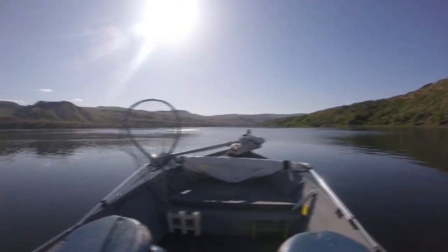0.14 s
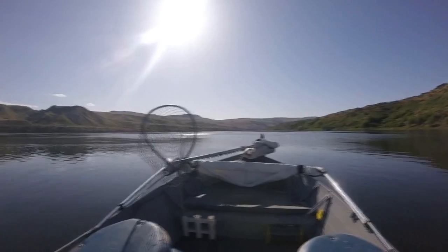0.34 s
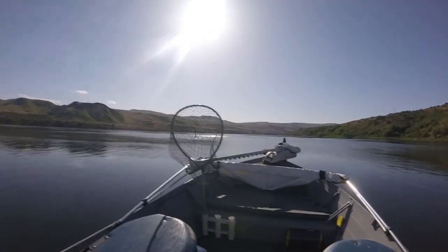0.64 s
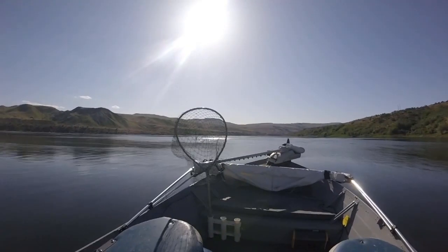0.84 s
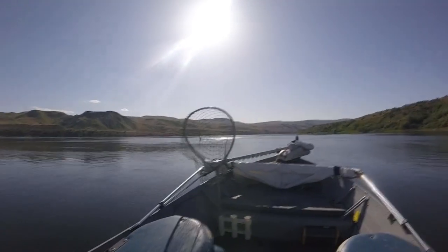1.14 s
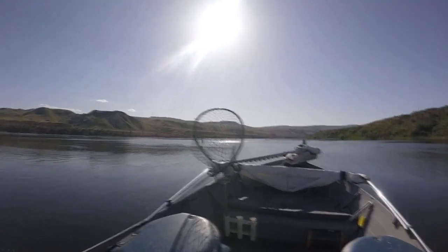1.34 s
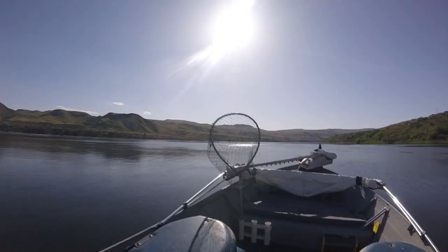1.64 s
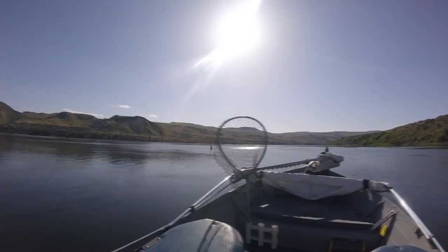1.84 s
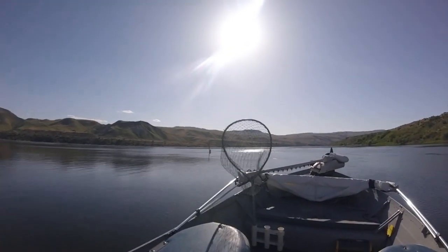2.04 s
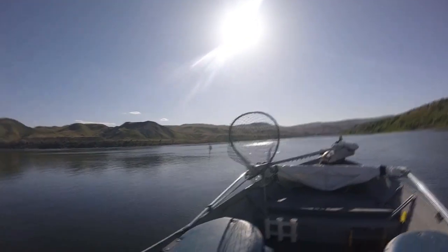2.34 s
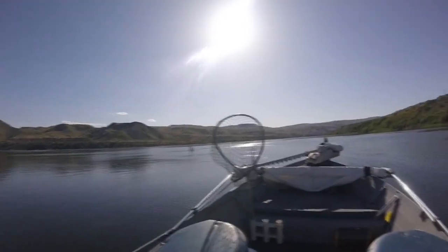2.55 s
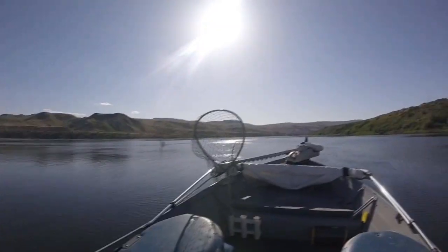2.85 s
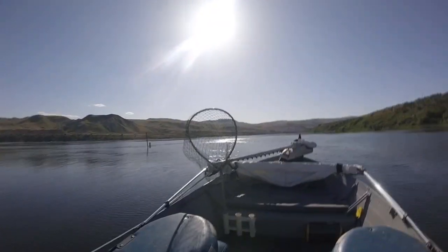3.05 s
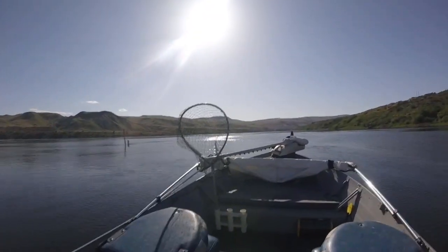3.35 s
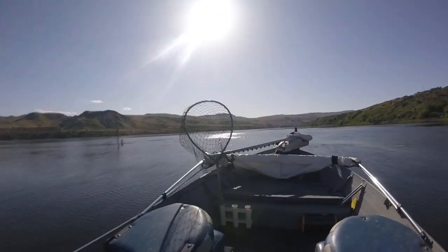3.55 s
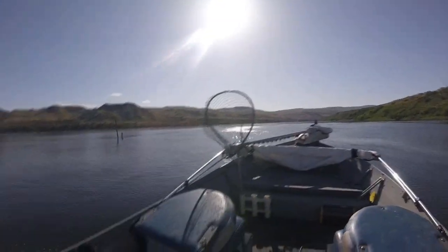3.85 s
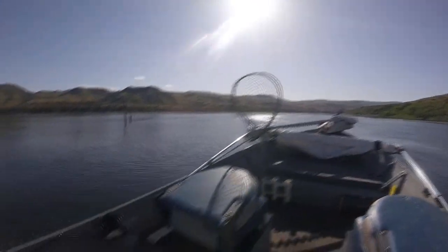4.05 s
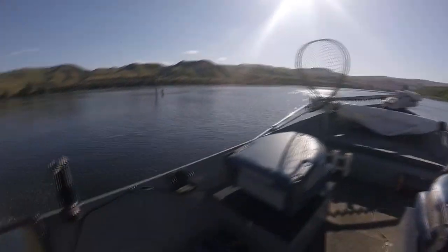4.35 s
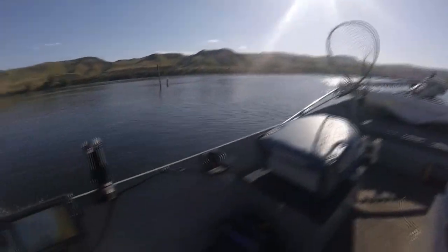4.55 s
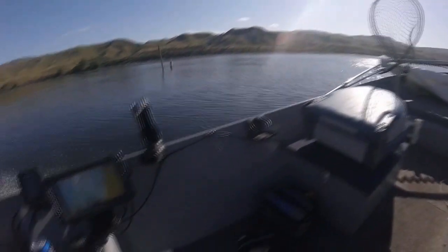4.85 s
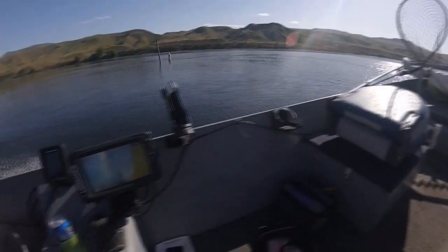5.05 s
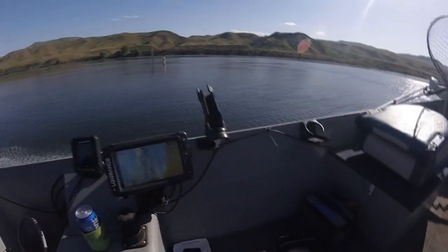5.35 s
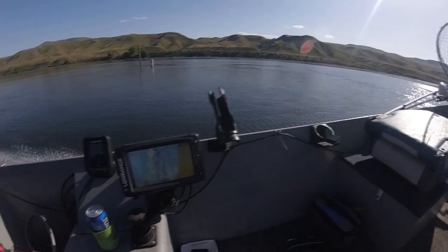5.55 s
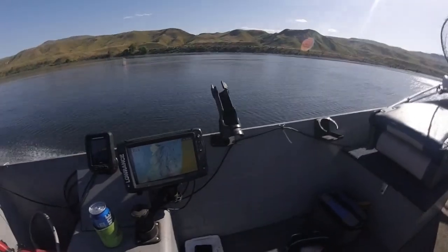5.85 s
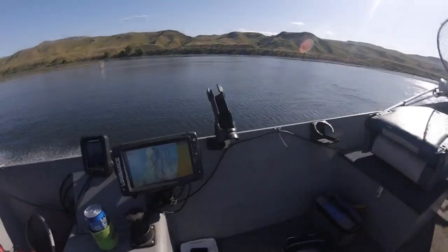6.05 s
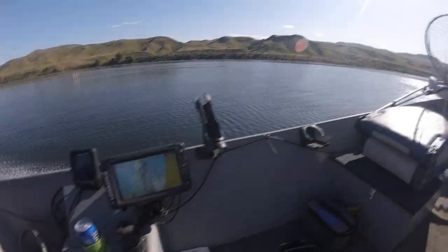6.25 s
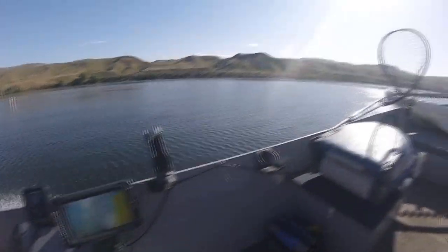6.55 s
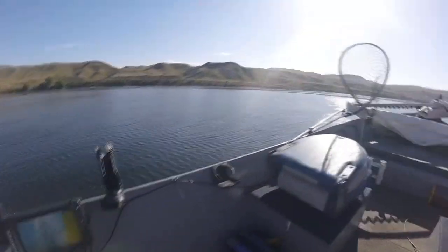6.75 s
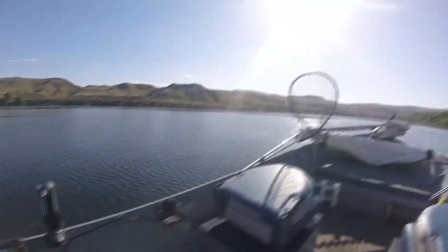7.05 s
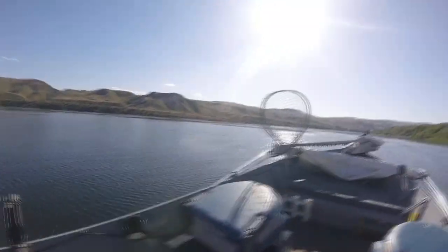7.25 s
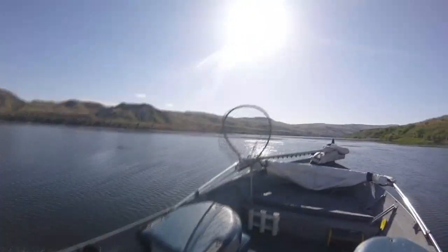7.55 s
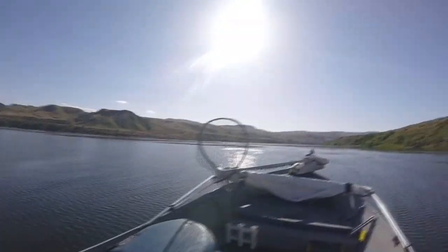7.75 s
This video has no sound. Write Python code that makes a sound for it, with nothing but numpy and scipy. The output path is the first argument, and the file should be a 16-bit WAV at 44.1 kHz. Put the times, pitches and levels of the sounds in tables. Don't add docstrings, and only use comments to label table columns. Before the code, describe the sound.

Close onboard perspective from a microphone worn on the head, outdoors with no room echo. An outboard hums at nearly constant pitch and spray washes broadly along the hull. Isolated wind knocks briefly duck the boat sound, which creeps back. Then the head turns, muffling motor and water, and dense fluttering gusts, low thumps and sharp clicks dominate, peaking in a hard crack late on and thinning a little afterwards.

```python
import sys
import numpy as np
from scipy import signal
from scipy.fft import rfft, irfft, next_fast_len
from scipy.io import wavfile
from scipy.ndimage import uniform_filter1d

SR = 44100
rng = np.random.default_rng(int(sys.argv[2]) if len(sys.argv) > 2 else 0)


def invert_db(level):
    return 10 ** (np.asarray(level, dtype=float) / 20)


def dump_mix(stems):
    frames = np.atleast_2d(stems).T
    limited = np.clip(frames, -1, 1)
    pcm = np.round(limited * 32767).astype(np.int16)
    wavfile.write(sys.argv[1], SR, pcm)


N = 347949

# (time [s], turn rate [1/s])
TURN_RATE_HZ = [(0, 50.23), (.6, 50.29), (1.4, 50.44), (1.8, 50.23), (2.2, 50.26), (2.6, 50.45),
                (3.0, 50.46), (3.4, 50.53), (4.2, 50.73), (5.4, 50.74), (6.0, 50.88), (6.6, 50.72),
                (7.89, 50.73)]
# (time [s], share [0-1])
HEAD_ASIDE = [(0, 0), (4.7, 0), (5.6, .6), (6.3, .95), (7.5, .95), (7.89, .85)]
# (frequency [Hz], density [dB per Hz])
ROAR_SPECTRUM = [(120, 1.5), (300, -0.5), (700, -5.5), (1200, -10.5), (2000, -20.5)]
# (time [s], length [s], roar level [dB], rasp over roar [dB])
AIR_RUSHES = [(0, 0.017, -40.5, 3), (0.024, 0.053, -34, -5.5), (0.065, 0.11, -30.5, -10.5),
              (0.202, 0.068, -31, -8.5), (4.6, 0.017, -33.5, -11), (4.628, 0.046, -30.5, -10),
              (4.724, 0.096, -30, -12), (4.84, 0.081, -32, -16.5), (4.914, 0.031, -30.5, -8),
              (4.96, 0.039, -49, -2), (4.987, 0.031, -38.5, 1), (5.02, 0.075, -36, -3.5),
              (5.117, 0.16, -39, .5), (5.27, 0.037, -36, 1.5), (5.328, 0.052, -40, -2),
              (5.412, 0.055, -40, -3), (5.456, 0.11, -39.5, -4), (5.539, 0.09, -32.5, -9),
              (5.602, 0.15, -32, -8.5), (5.811, 0.15, -29.5, -14), (5.961, 0.067, -30, -12),
              (6.012, 0.079, -31, -13.5), (6.144, 0.097, -28.5, -14.5), (6.331, 0.057, -25.5, -14.5),
              (6.388, 0.027, -30, -13), (6.427, 0.048, -38.5, -6.5), (6.506, 0.056, -34.5, -17),
              (6.68, 0.042, -34, -15), (6.9, 0.11, -35.5, -21), (7.129, 0.046, -34, -16)]


def rms_one(x):
    return x / np.sqrt(np.mean(x ** 2) + 1e-20)


def curve(rows):
    time_s, value = np.transpose(rows)
    return np.interp(np.arange(N) / SR, time_s, value)


def drift(rate_hz):
    r = np.exp(-80 * np.pi * rate_hz / SR)
    white = rng.standard_normal(N // 40 + 2002)
    slow = signal.lfilter([1], [1, -2 * r, r * r], white)[2000:]
    return np.interp(np.arange(N) / 40, np.arange(len(slow)), rms_one(slow))


def noise(spectrum, lumpy_db, rate_hz):
    hz, density_db = np.transpose(spectrum)
    size = next_fast_len(N)
    bin_hz = np.arange(size // 2 + 1) * SR / size + 1e-3
    shape = invert_db(np.interp(np.log(bin_hz), np.log(hz), density_db, left=-90, right=-90))
    white = rng.standard_normal(N) * invert_db(lumpy_db * drift(rate_hz))
    return rms_one(irfft(rfft(white, size) * shape, size)[:N])


def drops():
    # (time [s], length [s], start [Hz], end [Hz], level [dB])
    chirps = [
        (2.02, 0.039, 2400, 2550, -56.5),
        (2.108, .05, 2870, 2660, -52),
        (2.19, 0.041, 2620, 2430, -50),
        (2.277, 0.034, 2330, 2200, -50),
        (2.383, .02, 2100, 2300, -50),
        (2.553, 0.045, 2410, 2950, -48),
        (2.587, 0.011, 1740, 2000, -42),
    ]
    out, wobble = np.zeros(N), drift(60)
    for time_s, length_s, start_hz, end_hz, level_db in chirps:
        i, size = round(time_s * SR), round(length_s * SR)
        phase = 2 * np.pi * np.cumsum(np.linspace(start_hz, end_hz, size)) / SR
        whistle = np.sin(phase + 1.4 * wobble[i:i + size])
        out[i:i + size] += invert_db(level_db - 1.0) * signal.windows.tukey(size, .6) * whistle
    return out


def spray():
    # (frequency [Hz], density [dB per Hz])
    ahead_spectrum = [(70, -25.5), (130, -4.5), (250, -7), (500, -15), (1000, -18), (1900, -21.5),
                      (3000, -26), (4300, -29.5), (5200, -25.5), (6500, -27.5), (8000, -34), (11000, -46.5),
                      (12200, -60), (15000, -71)]
    # (frequency [Hz], density [dB per Hz])
    aside_spectrum = [(70, -30), (130, -6), (500, -13.5), (1500, -23.5), (2700, -22), (4200, -33.5),
                      (5250, -24), (7700, -37), (11000, -52), (12200, -72), (15000, -75)]
    ring_hz, ring_width_hz, ring_db = 6360, 610, -13.5
    aside = curve(HEAD_ASIDE)
    throb = 1 + 0.049 * np.sin(2 * np.pi * np.cumsum(curve(TURN_RATE_HZ)) / SR)
    r, w = np.exp(-np.pi * ring_width_hz / SR), 2 * np.pi * ring_hz / SR
    ring = rng.standard_normal(N)
    for _ in range(2):
        ring = signal.lfilter([1, 0, -1], [1, -2 * r * np.cos(w), r * r], ring)
    ahead = noise(ahead_spectrum, lumpy_db=-1.26, rate_hz=12)
    ahead += invert_db(ring_db + 1.3 * drift(30)) * rms_one(ring)
    shaded = invert_db(6.5) * noise(aside_spectrum, lumpy_db=1.0, rate_hz=29)
    wash = np.sqrt(1 - aside) * ahead + np.sqrt(aside) * shaded
    return invert_db(-36.5 - 18.5 * aside) * throb * wash


def motor():
    # (multiple of turn rate [1], level [dB])
    harmonics = [(2, -2), (3, -24.5), (4, 0), (5, -14.5), (6, -4), (7, -15), (8, -20), (9, -26.5),
                 (10, -19), (11, -25), (12, -23.5), (13, -38.5), (14, -20), (15, -16.5), (16, -26),
                 (17, -31.5), (18, -17), (19, -39), (20, -32), (21, -36), (22, -38.5), (23, -47),
                 (24, -38.5), (25, -29.5), (26, -19), (27, -27), (28, -35.5), (29, -32), (30, -39.5),
                 (31, -30.5),
                 (42, -37.5), (52, -34.5), (56, -38.5)]
    # (time [s], level [dB])
    whine_db = [(0, -22), (3, -20.5), (3.7, -19), (4.2, -17), (4.6, -26.5), (5.8, -25), (6.5, -27),
                (7, -34.5), (7.4, -29.5), (7.89, -27.5)]
    gear_multiple = 26
    aside = curve(HEAD_ASIDE)
    turns = np.cumsum(curve(TURN_RATE_HZ) * (1 + 0.00077 * drift(9.0))) / SR
    exhaust, cowl, gear = parts = np.zeros((3, N))
    for multiple, level_db in harmonics:
        part = 2 if multiple == gear_multiple else int(multiple >= 8)
        loose = np.clip(-level_db / 15 - 1, .3, 1.2)
        waver = invert_db(level_db + 3 * loose * drift(12))
        phase = 2 * np.pi * (multiple * turns + rng.random())
        parts[part] += waver * np.sin(phase + .8 * loose * (part < 2) * drift(8))
    mix = invert_db(-25 - 10 * aside) * exhaust + invert_db(-26 - 13.5 * aside) * cowl
    return np.sqrt(2) * (mix + invert_db(curve(whine_db)) * gear)


def gain_db():
    # (time [s], gain [dB])
    gain_steps = [(0, -10.5), (1.611, -15), (2.203, -9), (2.928, -10), (3.371, -11.5), (4.298, -14.5),
                  (4.673, -16), (4.92, -11.5), (5.1, -12), (5.303, -11), (5.52, -9), (5.743, -9), (6.093, -7.5),
                  (6.33, -3.5), (6.45, -5), (6.573, -2), (6.9, -2), (7.149, 1)]
    recovery_s = 0.79
    time_s, depth_db = np.transpose(gain_steps)
    t = np.arange(N) / SR
    last = np.maximum(np.searchsorted(time_s, t) - 1, 0)
    return uniform_filter1d(depth_db[last] * np.exp(-(t - time_s[last]) / recovery_s), size=180)


def buffet():
    # (time [s], level [dB])
    wind = [(0.0, -39.5), (1.1, -36), (1.47, -26), (1.74, -44), (1.95, -44.5), (2.11, -37.5), (2.4, -34.5),
            (2.94, -39), (3.73, -34.5), (3.98, -32), (5.05, -34), (5.12, -37), (5.65, -33.5), (6.08, -38),
            (6.5, -25.5), (6.66, -33), (7.1, -33.5), (7.89, -33)]
    # (frequency [Hz], density [dB per Hz])
    rumble_spectrum = [(12, 2), (25, 7.5), (70, 5), (110, -3.5), (200, -23)]
    # (frequency [Hz], density [dB per Hz])
    flutter_spectrum = [(60, -27), (110, 3), (200, 0.5), (400, -8), (900, -25.5), (2000, -49.5)]
    aside, wind_db = curve(HEAD_ASIDE), curve(wind)
    gust_db = wind_db - wind_db.mean()
    rumble = noise(rumble_spectrum, lumpy_db=3.5, rate_hz=6)
    rumble /= np.sqrt(uniform_filter1d(rumble ** 2, size=4000) + 1.5)
    flutter_db = -41.5 + 13 * aside + 0.5 * gust_db + 0.83 * drift(3.7)
    flutter = invert_db(flutter_db) * noise(flutter_spectrum, lumpy_db=5.0, rate_hz=51)
    draught = aside * invert_db(-40 + 0.29 * gust_db) * noise(ROAR_SPECTRUM, lumpy_db=3.5, rate_hz=70)
    return draught + invert_db(wind_db + 8.5) * rumble + flutter


def rushes():
    # (frequency [Hz], density [dB per Hz])
    rasp_spectrum = [(800, 1.5), (1400, -0.5), (2500, -3), (3800, -13), (5000, -31)]
    # (frequency [Hz], density [dB per Hz])
    hiss_spectrum = [(3500, -8), (5000, 2), (6500, -3), (8500, -20), (11000, -31), (12200, -34),
                     (15000, -40.5)]
    crest = 0.56
    ragged = invert_db(2.0 * drift(100))
    spectra = (ROAR_SPECTRUM, rasp_spectrum, hiss_spectrum)
    layers = ragged * np.array([noise(s, lumpy_db=1.5, rate_hz=33) for s in spectra])
    steepness = np.array([[1], [1.3], [1.6]])
    out = np.zeros(N)
    for time_s, length_s, roar_db, rasp_db in AIR_RUSHES:
        i, j = round(time_s * SR), round((time_s + length_s) * SR)
        swell_db = np.interp(np.linspace(0, 1, j - i), [0, crest, 1], [-7, 1.5, -5])
        swell = invert_db(swell_db) * signal.windows.tukey(j - i, .25)
        gains = invert_db(roar_db + np.array([1.5, rasp_db + 0.058, -9 + 1.35 * rasp_db]))
        out[i:j] += gains @ (swell ** steepness * layers[:, i:j])
    return out


def ticks():
    # (time [s], peak [dB])
    housing_ticks = [(1.6537, -50), (4.6144, -45), (4.6486, -62), (4.9199, -60), (4.958, -55),
                     (4.9664, -43.5), (5.0004, -49), (5.0118, -60), (5.0573, -55), (5.2321, -52),
                     (5.2974, -52.5), (5.349, -64), (5.3567, -63), (5.4475, -53), (5.4958, -54.5),
                     (5.9832, -61), (5.9882, -65), (6.2134, -61), (6.6184, -56), (7.8898, -62),
                     (6.3898, -61), (6.404, -67), (6.467, -60)]
    out, t = np.zeros(N + 400), np.arange(-100, 300) / SR
    bright = signal.butter(2, [3000, 9000], "band", fs=SR, output="sos")
    for time_s, peak_db in housing_ticks:
        burst = rng.standard_normal(400) * np.exp(-np.abs(t) / 0.00054)
        i = round(time_s * SR) - 100
        out[i:i + 400] += invert_db(peak_db + 12) * signal.sosfilt(bright, burst)
    return out[:N]


def crackle():
    start_s, length_s, roar_db = np.transpose(AIR_RUSHES)[:3, :, None]
    place, size = rng.random((2, len(AIR_RUSHES), 2))
    time_s = start_s + place * length_s
    peak_db = roar_db + 10 - 7 * size
    return list(zip(time_s.ravel(), peak_db.ravel()))


def snaps():
    # (time [s], peak [dB])
    pressure_snaps = [(.238, -23.5), (.5317, -14), (1.6543, -13), (2.2507, -18), (2.9599, -14.5),
                      (2.9674, -14.5), (3.4105, -18), (3.4311, -15.5), (4.3428, -16.5), (4.6084, -15),
                      (4.6486, -30.5), (4.6655, -17.5), (4.9333, -18), (4.9403, -13.5), (4.9637, -19),
                      (4.9995, -16), (5.2579, -15), (5.2957, -18), (5.3396, -18.5), (5.3979, -20),
                      (5.6839, -19), (6.0006, -35), (6.1546, -31.5), (6.2806, -20.5), (6.6181, -6),
                      (6.8453, -17), (6.9259, -20), (7.1502, -19), (7.3664, -25), (7.6307, -27),
                      (6.0118, -19), (6.2128, -22), (6.3695, -20), (6.4459, -24), (6.513, -25), (6.5518, -22),
              (6.663, -23), (6.699, -17.5), (6.755, -20.5), (6.815, -21), (6.879, -27), (6.913, -20),
              (6.9861, -17), (7.159, -24), (7.232, -22)]
    lowest_hz, spread = 600, .35
    corner_s, puff_s, puff_db, puff_hz = 0.00013, 0.0025, -21.5, 1700
    out, t = np.zeros(N + 400), np.arange(-100, 300) / SR
    low = signal.butter(3, puff_hz, fs=SR, output="sos")
    grit = rms_one(signal.sosfilt(low, rng.standard_normal(len(out))))
    puff_shape = invert_db(puff_db) * np.exp(-((t - puff_s / 2) / puff_s * 2) ** 2)
    for time_s, peak_db in [*pressure_snaps, *crackle()]:
        turn, skew, pitch = rng.random(3)
        hz = lowest_hz * (1 + spread * pitch)
        swell = np.exp((corner_s - np.hypot(t, corner_s)) * hz * np.where(t < 0, 3.5, 1.7))
        swing = np.cos(2 * np.pi * (hz * t + turn))
        swing += 0.28 * np.cos(2 * np.pi * (2.16 * hz * t + skew))
        swing += 0.093 * np.cos(2 * np.pi * (3.6 * hz * t - skew)) * swell
        i = max(round(time_s * SR) - 100, 0)
        puff = puff_shape * grit[i:i + len(t)]
        out[i:i + len(t)] += invert_db(peak_db - 1.5) * (swell * swing + puff)
    return out[:N]


def thumps():
    # (time [s], length [s], level [dB], centre [Hz])
    strikes = [(1.433, 0.028, -28, 79.0), (1.652, 0.027, -12.5, 86), (1.962, 0.023, -27, 74.4),
               (2.249, 0.029, -16, 70.4), (2.591, 0.019, -21.5, 64.6), (2.969, 0.042, -13.5, 90),
               (3.418, 0.032, -10.5, 125), (3.892, 0.048, -21.5, 64.5), (4.149, 0.045, -23, 78),
               (4.357, 0.037, -15, 66), (4.611, 0.056, -18, 67.4), (4.673, 0.066, -14, 52.5),
               (4.943, 0.03, -14, 52.7), (5.006, 0.043, -15, 83), (5.073, 0.033, -17, 79),
               (5.111, 0.053, -17, 57.6), (5.257, 0.062, -20.5, 80), (5.3, 0.024, -16.5, 112.0),
               (5.428, 0.04, -21.5, 66.0), (6.008, 0.048, -21, 125), (6.27, 0.03, -20.5, 114),
               (6.417, 0.057, -19.5, 190), (6.621, 0.017, -14.5, 146), (6.706, 0.026, -19, 118),
               (6.766, 0.028, -20.5, 86.5), (6.852, 0.065, -19.5, 88), (6.923, 0.025, -17, 123),
               (7.196, 0.066, -28.5, 91), (7.364, 0.05, -20.5, 94), (7.653, 0.064, -20.5, 100)]
    out = np.zeros(N)
    smooth = signal.butter(2, 550, fs=SR, output="sos")
    for time_s, length_s, level_db, hz in strikes:
        eddy = rng.standard_normal(6000)
        size = min(round(1.3 * length_s * SR), 4000)
        band = signal.butter(1, [.5 * hz, 2.53 * hz], "band", fs=SR, output="sos")
        rough = rms_one(signal.sosfilt(np.vstack([band, smooth]), eddy)[-size:])
        cycles = 0.785 * hz * (np.arange(size) - size / 2) / SR
        flip = rms_one(np.sin(2 * np.pi * cycles) + 0.57 * np.sin(4 * np.pi * cycles))
        swing_sign, push_sign = np.sign(eddy[:2])
        motion = swing_sign * flip + .5 * rough + 0.83 * push_sign
        i = round(time_s * SR) - size // 2
        out[i:i + size] += invert_db(level_db - 1.6) * rms_one(motion * np.hanning(size))
    return out


def scene():
    boat = invert_db(gain_db()) * (spray() + motor())
    wind = buffet() + rushes() + ticks() + snaps() + thumps()
    return (drops() + boat + wind)[None]


def band_limit(x):
    return signal.sosfilt(signal.butter(12, 15000, fs=SR, output="sos"), x)


def record(dry):
    dull = signal.sosfilt(signal.butter(1, [14, 12000], "band", fs=SR, output="sos"), dry)
    return band_limit(.6 * np.tanh(dull / 0.63))


dry = scene()
out = record(dry)
dump_mix(out)
```